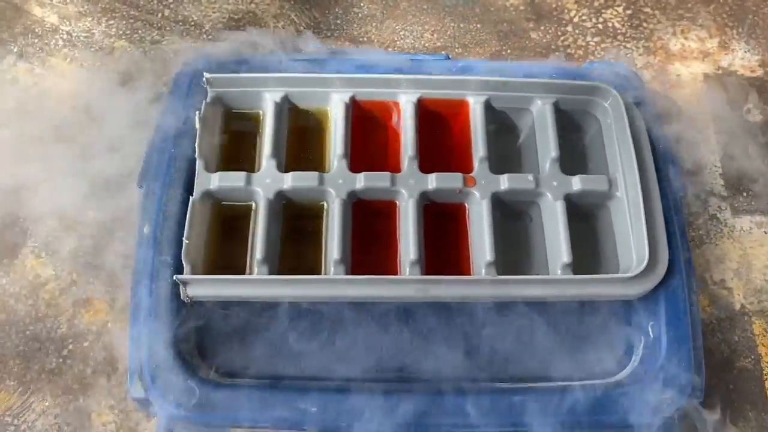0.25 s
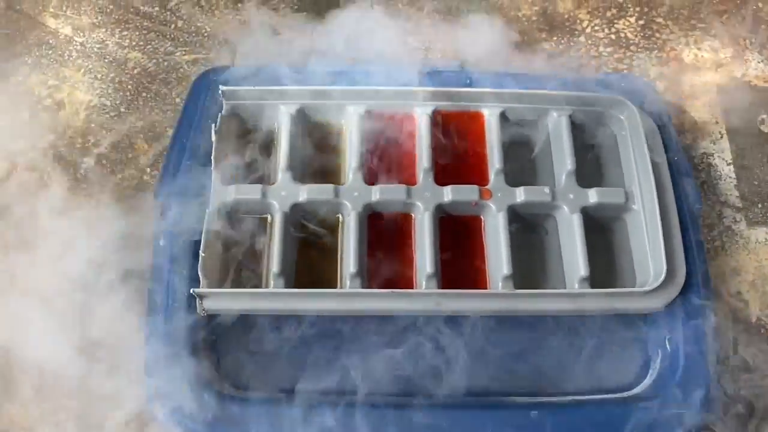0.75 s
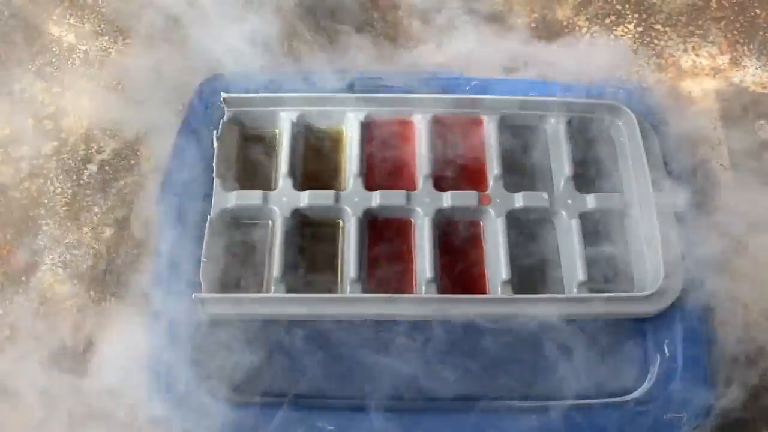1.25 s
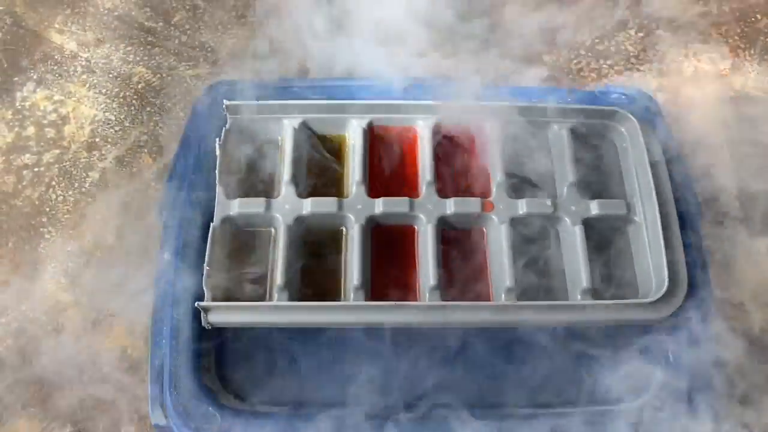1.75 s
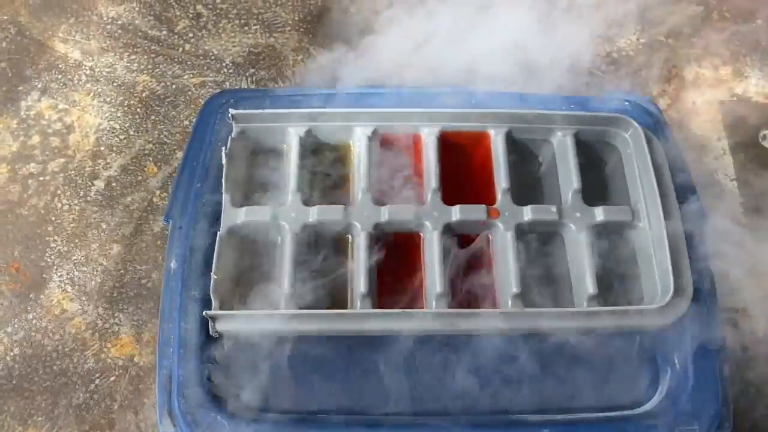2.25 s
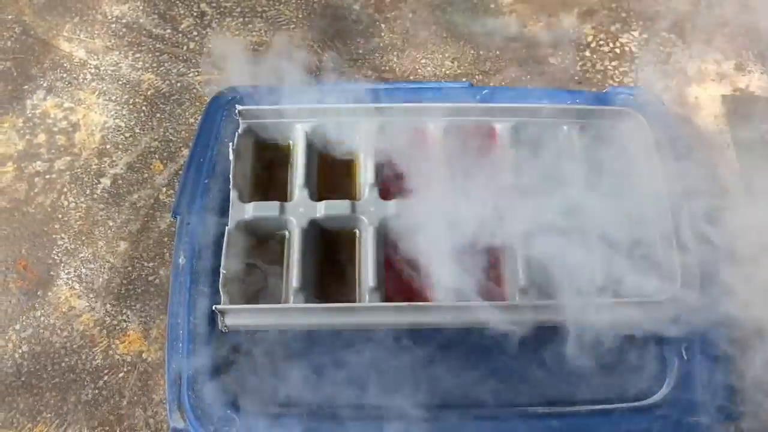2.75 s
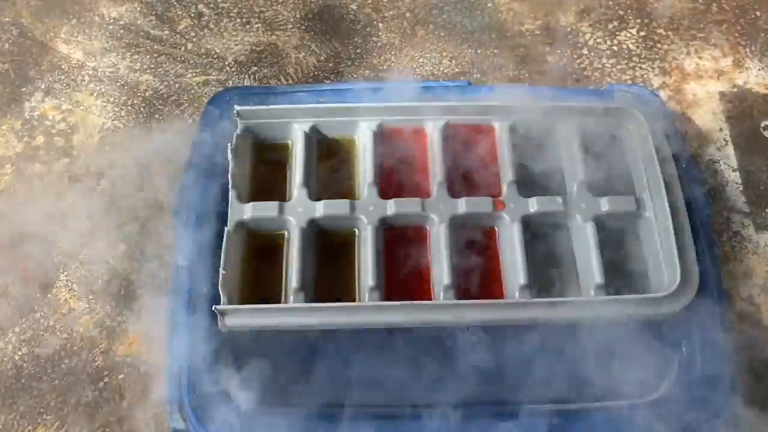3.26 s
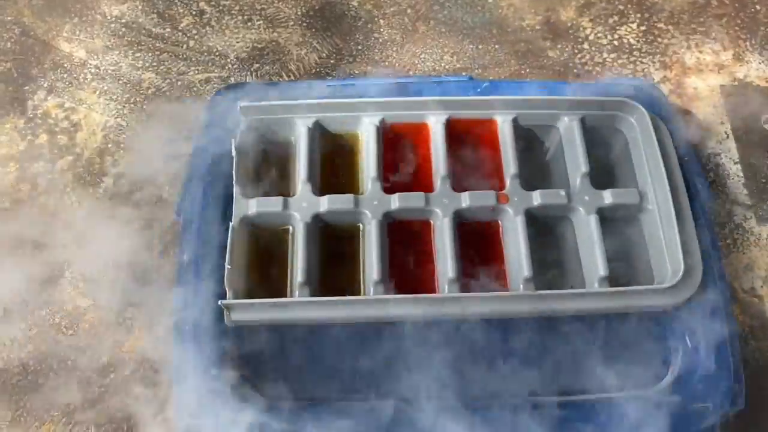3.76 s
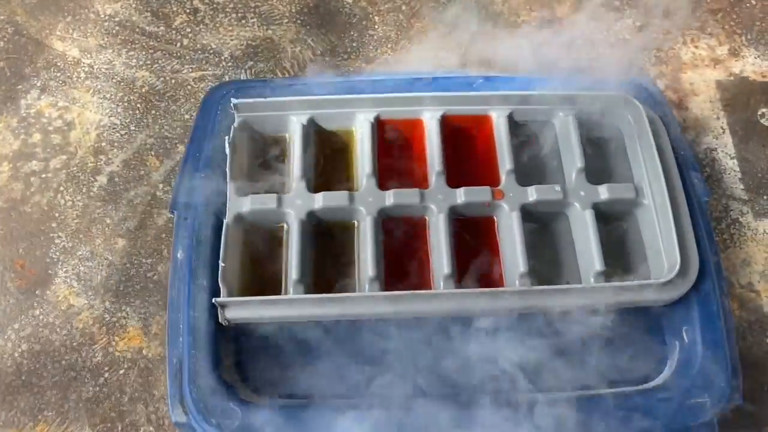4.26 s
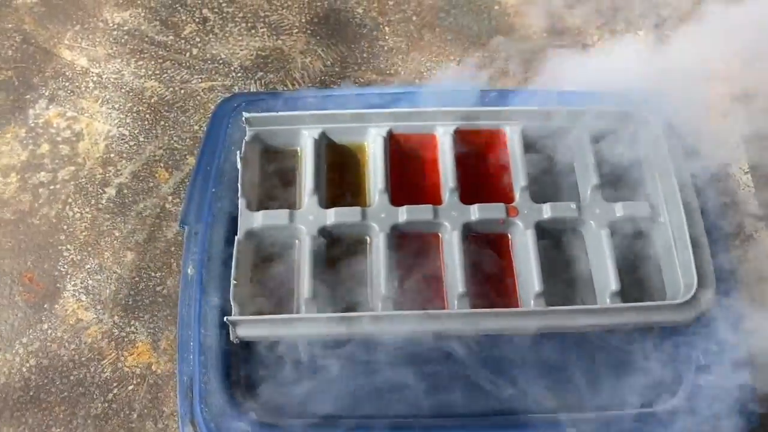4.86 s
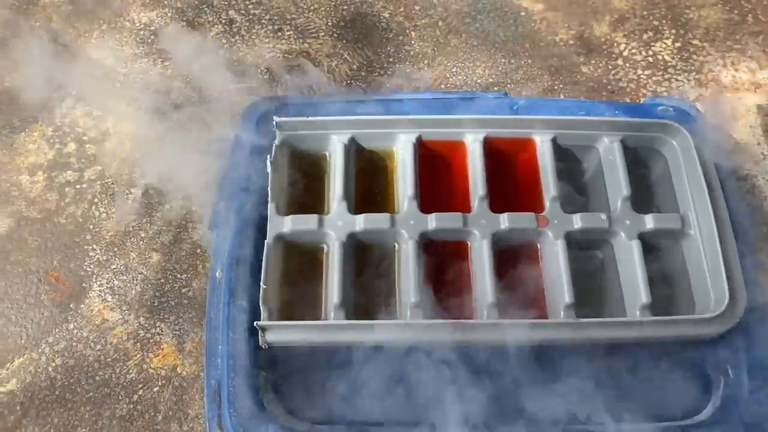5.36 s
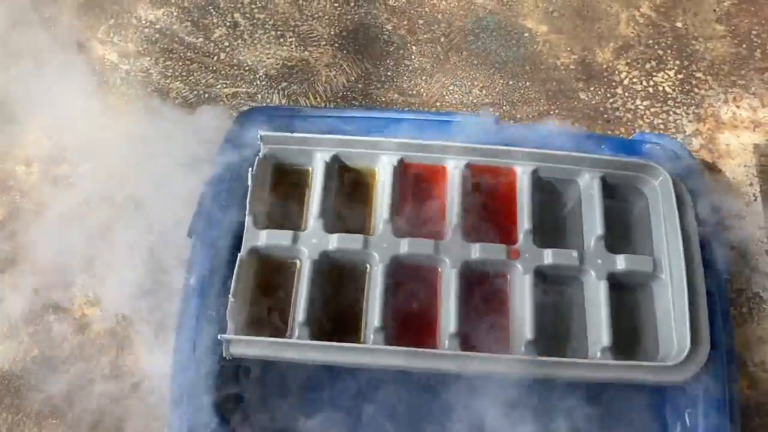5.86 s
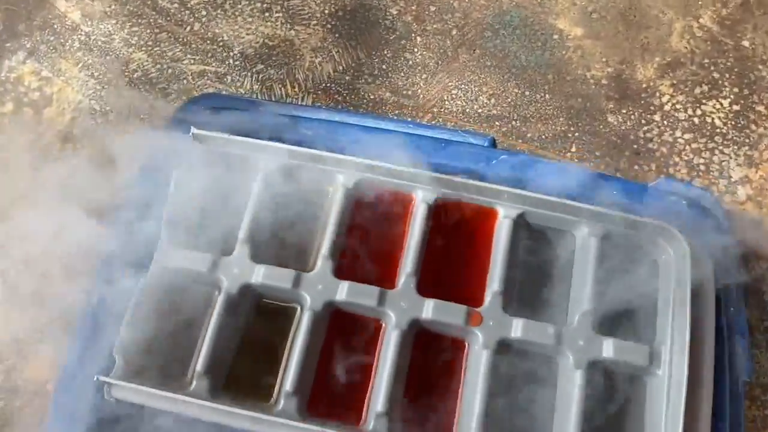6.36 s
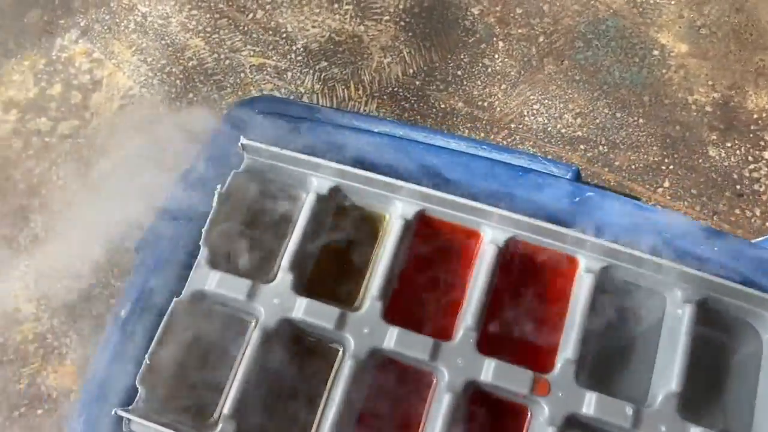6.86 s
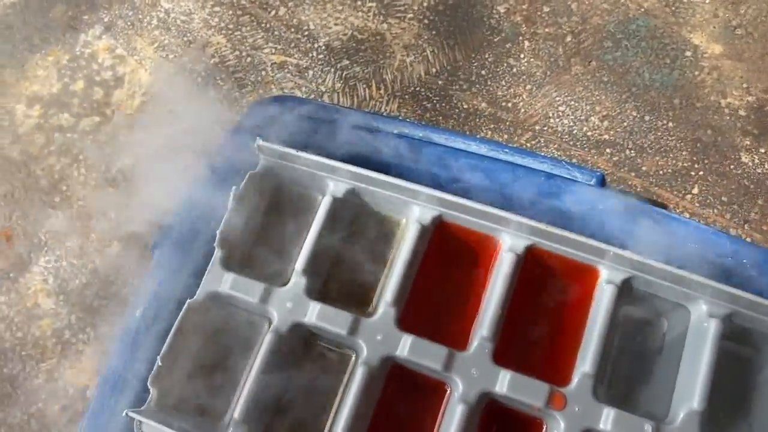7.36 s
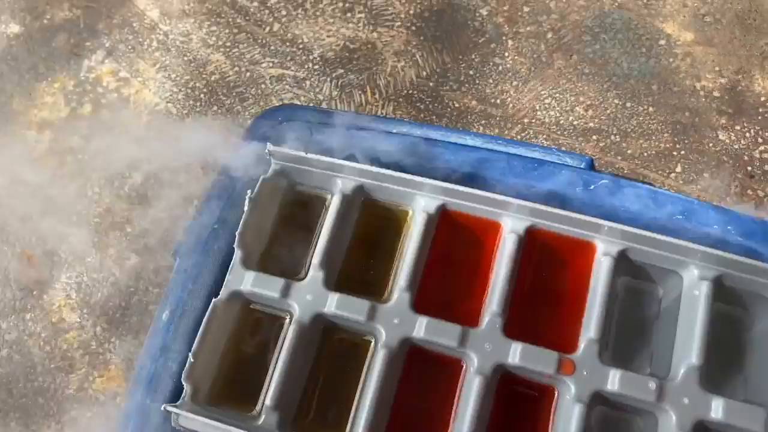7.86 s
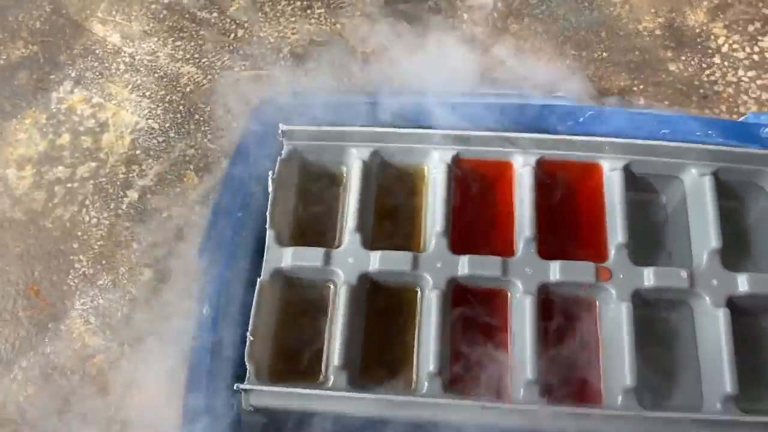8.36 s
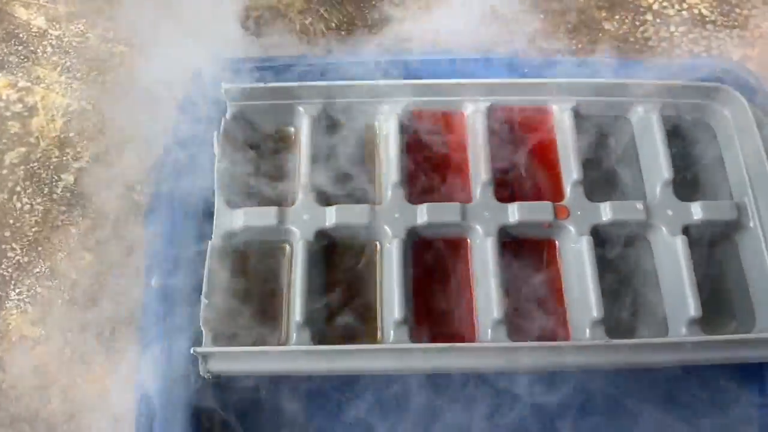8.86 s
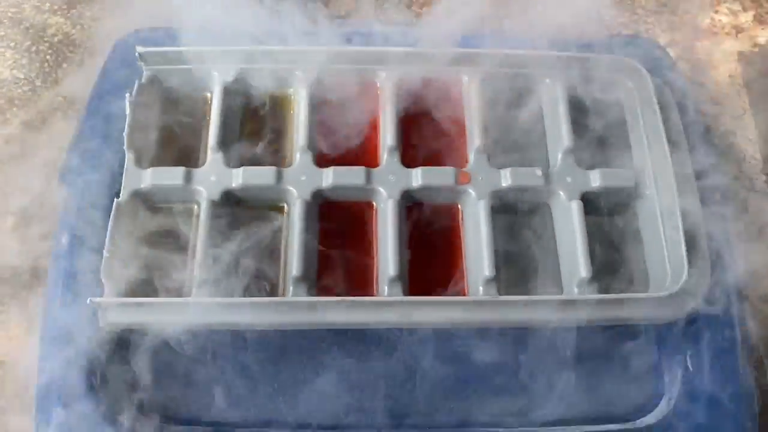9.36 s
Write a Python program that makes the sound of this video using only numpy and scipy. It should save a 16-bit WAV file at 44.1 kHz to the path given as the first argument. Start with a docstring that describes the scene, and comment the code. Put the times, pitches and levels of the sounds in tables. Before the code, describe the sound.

Sharp brittle cracks and tiny frost ticks over a soft, hollow boiling fizz under a plastic tray outdoors, with light air rumble and some handling noise.

```python
"""Sharp cracks and ticks over the fizz and pop of small bubbles, with puffs of air and rubs of a finger.
Liquid nitrogen simmers in a plastic lid under an ice-cube tray, outdoors on stone, close to a hand-held camera.
Cracks are blows that rattle damped modes of ice and plastic; the boil is coloured noise, clicks and short rings.
Air is low rumble with slowing swings of pressure; finger and hand are noise and slips coloured by case and skin."""
import sys
import numpy as np
from scipy import signal
from scipy.fft import rfft, irfft
from scipy.io import wavfile

SR = 44100
rng = np.random.default_rng(int(sys.argv[2]) if len(sys.argv) > 2 else 0)


def materialize(psi):
    """Save the field psi as 16-bit PCM at rate SR to the path in sys.argv[1].

    A 1-D psi becomes a single channel; in a 2-D psi each row is a channel.
    """
    bounded = np.clip(np.atleast_2d(psi).T, -1, 1)
    quanta = np.round(bounded * 32767).astype(np.int16)
    wavfile.write(sys.argv[1], SR, quanta)


N = 423351
FREQS = np.fft.rfftfreq(N, 1 / SR)
TIME = np.arange(N) / SR

# All source levels and colours are relative dB: gains in the functions come on top. Cracks of the freezing ice
# and plastic; the row at 6.41 s is instead the sharp part of the finger's bump on the camera. Each row: time in
# seconds, levels of tray, wall, ice and snap in dB, rings of cell, wall, wall again, ice and snap in Hz.
CRACK_EVENTS = [(0.0151, -44.5, -28.5, -27, -30.5, 1020, 1790, 3830, 7360, 10280),
                (0.1413, -59, -33.5, -38, -34.0, 1300, 2300, 2350, 5250, 8260),
                (0.2994, -49, -34.5, -39.5, -35, 1010, 3520, 2490, 5200, 8450),
                (0.4545, -63, -46, -37, -39.5, 1140, 1800, 3550, 7400, 7450),
                (0.534, -57, -49, -42, -46.5, 1400, 2080, 2410, 7300, 10130),
                (1.1176, -46, -39, -48, -43, 960, 2300, 1740, 5540, 7500),
                (1.419, -68, -53, -45.5, -45, 930, 3900, 2320, 5260, 8340),
                (1.4814, -61, -50.5, -42.5, -42.5, 950, 2720, 3920, 6440, 7150),
                (1.6325, -65, -47, -43, -49.5, 1300, 2460, 1770, 5960, 7300),
                (1.856, -48, -40, -58, -46, 1150, 1980, 1750, 7200, 9100),
                (2.2213, -36, -25, -23, -21.5, 1025, 3340, 2750, 5600, 7340),
                (2.733, -53, -43.5, -41.5, -38, 1370, 3100, 1860, 6060, 8150),
                (2.873, -61.0, -53, -41.5, -41, 1270, 2250, 2600, 5830, 7790),
                (3.0296, -68.0, -47.5, -46, -40, 1400, 3570, 2440, 4800, 7630),
                (3.0596, -36, -24.5, -25.0, -23.5, 1310, 1740, 2230, 6400, 9840),
                (3.2051, -48, -36, -37.5, -35.5, 1340, 2350, 3220, 6000, 9600),
                (3.389, -70, -48.5, -43.5, -40.5, 1290, 3470, 1900, 5370, 7900),
                (3.462, -58, -49.5, -49.5, -49, 1400, 2050, 2510, 5840, 7700),
                (3.6218, -54, -45.5, -50.5, -45.5, 1400, 1970, 2800, 5640, 7260),
                (3.8155, -55.0, -46, -37, -38.5, 1310, 1940, 3000, 7160, 7360),
                (4.301, -22, -19.5, -21.5, -24, 850, 2150, 2840, 7400, 10700),
                (4.66, -70, -49.5, -40.5, -42, 1200, 2560, 1580, 5700, 7440),
                (4.8395, -71, -51, -44, -45, 1400, 2960, 3780, 5660, 8540),
                (4.864, -47.5, -38.0, -44, -33.5, 1290, 1900, 2240, 7200, 7200),
                (4.9506, -53, -42, -36, -41, 1380, 2100, 1630, 5330, 7800),
                (4.9887, -56, -47.0, -45.5, -40.5, 1300, 2270, 1750, 5730, 7460),
                (5.7266, -46, -34.5, -27, -36, 1290, 1900, 2700, 5800, 11800),
                (6.4081, -41, -35.5, -38, -48.5, 1400, 2090, 1560, 4680, 8960),
                (6.855, -41.5, -36, -27, -33.5, 870, 2460, 3960, 5700, 7550),
                (7.2648, -47, -43, -47, -50, 850, 2200, 3900, 7200, 9210),
                (7.3066, -16.5, -20.5, -22.5, -26, 850, 2100, 3130, 5460, 9960),
                (7.4175, -59, -52, -46.5, -41, 870, 2290, 3370, 5680, 8160),
                (7.5691, -44.5, -39, -47, -42.5, 1170, 1800, 2240, 7100, 9910),
                (7.8329, -40.5, -30.5, -25.5, -28, 895, 1650, 1920, 4980, 7900),
                (8.269, -60, -45, -52.5, -47.5, 1110, 1800, 2250, 5800, 10090),
                (8.4914, -52, -61, -50, -48, 960, 1630, 2350, 5800, 10070),
                (9.1247, -57, -30, -19, -23.5, 1010, 3420, 1950, 7500, 8300)]
# Low modes of the whole tray, each a close pair that beats. Each row: centre in Hz, level in dB, t60 in seconds.
TRAY_MODES = [(880, 0.5, 0.029), (1250, 1.5, 0.031), (1590, -2.5, 0.012)]
# Ranges in which cell, wall, ice, snap and its topmost sparkle sound: edges in Hz.
CELL_HZ, WALL_HZ, ICE_HZ, SNAP_HZ = (850, 1400), (1600, 3520), (4980, 8240), (7500, 11000)
SPARKLE_HZ = (12700, 14700)
# Clear ticks of frost. Each row: start in seconds, level in dB.
FROST_TICKS = [(0.499, -33), (1.506, -29.5), (2.67, -32.5), (4.516, -34), (4.6227, -35), (4.7516, -36),
               (5.018, -35), (5.2474, -35), (5.2838, -34.5), (5.418, -36), (5.888, -36), (6.042, -35.5),
               (6.2276, -30.5), (6.3878, -35), (6.591, -29.5), (7.016, -31), (7.231, -30.5), (7.594, -31),
               (8.16, -36.5), (8.2317, -37), (8.391, -35), (8.6575, -33.5), (8.844, -32), (8.974, -31.5),
               (9.349, -28)]

# Vigour of the boil. Each row: time in seconds, level in dB.
BOIL_LEVEL = [(0.0, -55.5), (1.07, -56.5), (5.05, -56), (5.32, -57.5), (6.76, -54), (7.62, -55.5),
              (8.53, -55.5), (9.6, -55)]
# Colour of the wash of small bubbles. Each row: frequency in Hz, density in dB per Hz.
SIMMER_COLOUR = [(100, -3), (250, -1.5), (400, 2), (540, -3), (900, 1.5), (1120, -4.5), (1500, -4.5),
                 (2100, -6.5), (2550, -1.5), (3400, -10.5), (4400, -11.5), (5400, -55), (7000, -54),
                 (12000, -49)]
# Colour of the fine fizz. Each row: frequency in Hz, density in dB per Hz.
FIZZ_COLOUR = [(4000, -13), (5400, 5), (6500, -0.5), (7400, -7.5), (8400, 2), (10000, -1), (12500, -6),
               (16000, -20.5)]
# Colour of bursting bubbles. Each row: frequency in Hz, density in dB per Hz.
BUBBLE_COLOUR = [(250, -19), (800, 0.5), (1100, -17), (1800, 0), (2400, 0), (3000, -13.5), (3800, -16.5),
                 (5500, -28), (8000, -3), (14000, -34)]
# Air resonances between lid and tray. Each row: centre in Hz, width in Hz, lift in dB.
HOLLOW_MODES = [(337.6, 23.5, 13), (422, 31, 5.5), (814, 44, 2), (1310, 81, 8), (1750, 234, 6),
                (2135, 120, 5.5), (2410, 188, 6.5), (3103, 360, 6)]
# Large bubbles that burst on their own. Each row: start in seconds, level in dB.
BIG_BUBBLES = [(0.6018, -41), (1.2104, -41), (2.064, -35), (2.1507, -36), (2.164, -39), (2.1901, -36.5),
               (2.372, -40), (2.4906, -38), (2.947, -38), (2.962, -37), (3.471, -37), (5.84, -40),
               (8.163, -35), (8.232, -37), (8.241, -38), (8.2989, -39), (8.3264, -39), (8.3924, -40),
               (8.6107, -37), (8.8182, -36), (8.8434, -36), (8.8886, -39), (8.901, -41), (8.915, -37),
               (8.943, -38)]
# Sudden spits of boiling. Each row: start in seconds, level in dB, decay constant in seconds.
SPIT_EVENTS = [(5.591, -44.5, 0.028), (7.236, -41, 0.065), (8.481, -43.5, 0.057), (8.764, -33.5, 0.03),
               (9.16, -34, 0.013), (9.304, -43.5, 0.052)]
# Colour of a spit. Each row: frequency in Hz, density in dB per Hz.
SPIT_COLOUR = [(150, -9.5), (350, -4.5), (720, -7), (950, -12), (1500, -9.5), (2300, -5), (3000, -17.5),
               (3900, -21), (5600, -18), (8000, -20), (13000, -35)]

# Pushes of the finger along the case. Each row: start in seconds, length in seconds, level in dB.
FINGER_PUSHES = [(6.551, 0.043, -43), (6.608, 0.077, -42), (6.709, 0.14, -46.5), (6.815, 0.069, -41.5),
                 (6.885, 0.058, -44), (6.936, 0.066, -41), (7.032, 0.069, -40), (7.11, 0.02, -51.5)]
PUSH_RISE_S, PUSH_FADE_S = 0.016, 0.027
# Colour of the camera case. Each row: frequency in Hz, density in dB per Hz.
CASE_COLOUR = [(120, -27), (190, -10), (240, 0.5), (275, 7), (325, -12), (390, -0.5), (500, -13),
               (680, -10.5), (950, -31), (1400, -25), (3000, -64)]
# The bump rings the case. Each row: frequency in Hz, level in dB, t60 in seconds.
BUMP_S, BUMP_MODES = 6.411, [(278, -34, 0.16), (327, -29, 0.073), (413, -43, 0.029)]
# Colour of skin on the camera. Each row: frequency in Hz, density in dB per Hz.
SKIN_COLOUR = [(150, -37), (280, 3), (450, 7.5), (650, 0.5), (1000, 6.5), (1250, -6), (2100, -5),
               (3300, -8), (4700, -12), (6500, -37), (12000, -54)]
TURN_S, TURN_END_S, TURN_DB = 6, 8.55, -54.5
# Slopes before the turn, from its start, and further from its end.
TURN_RISE_DB_PER_S, TURN_EASE_DB_PER_S, TURN_FADE_DB_PER_S = 34, 2, 50

# The breeze at the microphone. Each row: time in seconds, level in dB.
AIR_LEVEL = [(0, -66), (0.35, -63), (0.5, -68), (0.95, -64), (1.12, -57), (1.75, -72), (2.3, -58.5),
             (3.5, -65.5), (3.9, -57), (4.8, -57), (5.4, -60.5), (5.8, -56.5), (6.3, -56), (6.9, -61),
             (7.45, -60.5), (7.8, -56), (8.3, -60.5), (9.6, -71)]
# Colour of the breeze. Each row: frequency in Hz, density in dB per Hz.
BREEZE_COLOUR = [(15, -40), (30, -8), (60, 5), (100, -3.5), (160, -8.5), (300, -13), (600, -59)]
# Single puffs. Each row: time in seconds (onset 5 ms before), level in dB, rate in Hz about one cycle in.
AIR_PUFFS = [(1.066, -46, 59), (1.198, -42.5, 88), (2.345, -38.5, 83.5), (2.54, -47, 74), (2.857, -47, 85),
             (2.896, -45, 100), (2.921, -40.5, 65), (2.977, -41, 76), (2.996, -47, 130), (3.251, -42.5, 75),
             (3.83, -43, 105), (3.874, -34.5, 122), (3.908, -43, 292), (3.92, -35, 162), (4.011, -39, 60),
             (4.102, -43, 282), (4.111, -36.5, 98), (4.168, -43.5, 230), (4.42, -46.5, 110),
             (4.93, -43.5, 80), (5.2, -41.5, 102), (5.931, -42, 71), (6.285, -43, 109), (6.362, -41, 80),
             (6.622, -39.5, 75), (6.672, -47, 80), (7.147, -45, 80.6), (7.291, -42.5, 86),
             (7.724, -34.5, 118), (7.872, -37.5, 116)]
# Rumble around a puff: level against the puff, and time constants of growth and decay.
WAKE_DB, WAKE_RISE_S, WAKE_FALL_S = -11.5, 0.032, 0.03

# Colour of the echo from the yard. Each row: frequency in Hz, density in dB per Hz.
ECHO_COLOUR = [(300, 0), (900, -2), (2000, -8), (3200, -1.5), (4300, -6), (5600, -1.5), (7000, -8),
               (10000, -19), (15000, -41)]
# Phase between the microphone ports. Each row: frequency in Hz, lead of the left in radians.
PORT_PHASE_RAD = [(0, 0), (700, -.8), (1250, -.3), (1700, 0), (2500, .7), (4000, .6), (4900, .1),
                  (7300, 3.1), (16000, 11.9)]
# Balance of the ports, scaled by each source's shade. Each row: frequency in Hz, left minus right in dB.
PORT_BALANCE_DB = [(150, -2), (400, -5), (800, -9), (1250, -20), (1700, -2.5), (2300, -2.5), (5000, 0)]
# Likeness of the ports in diffuse sound. Each row: frequency in Hz, correlation (no unit).
PORT_CORRELATION = [(60, 0.96), (300, 0.82), (640, 0.078), (1400, 0.79), (3000, 0.38), (6000, 1),
                    (15000, 1)]
EDGE_HZ = 16700


def cracks(wall_decay_s=0.019, ice_decay_s=0.018, snap_decay_s=0.012, cell_decay_s=0.026,
           weak_lift=3.65, big_lift=1.3, second_lift=0.61, ring_width=0.046,
           rise_s=0.00021, first_blow=0.62, sparkle_db=-14, pair_split_hz=125):
    """A fracture is a sharp blow and a short rattle through ice and wall; a big one rings the whole tray."""
    t = np.arange(2048) / SR
    hz = np.fft.rfftfreq(len(t), 1 / SR)
    out = np.zeros(N)

    def sized(x):
        """Scales to the energy of 10 ms at rms 1."""
        return x / np.sqrt(np.sum(x ** 2) / 441)

    def mode(ring_hz):
        """Response of one damped resonance."""
        return 1 / (1 + 1j * (hz - ring_hz) / (ring_width * ring_hz))

    def rattle(edges_hz, decay_s, rings, order):
        """Crowded, heavily damped modes fill a range almost evenly; the rings stand out."""
        chatter = rng.choice([-1., 1.], len(t)) * (1 - np.exp(-t / rise_s)) * gain_of(-60 * t / decay_s)
        burst = first_blow + rfft(chatter / np.linalg.norm(chatter))
        even = burst / (abs(burst) + 1e-9) ** .6  # flattens the spectrum
        sound = irfft(even * (1 + rings)) * np.exp(-t / decay_s)
        return sized(band(sound, edges_hz, order))

    # The beat of each pair cuts the knock short; signs alternate from mode to mode.
    knock = sum((-1) ** k * ring([pair], t) for k, pair in enumerate(TRAY_MODES))
    whole = sized(np.sin(np.pi * pair_split_hz * t) * knock)
    for s, tray_db, wall_db, ice_db, snap_db, cell_hz, wall_hz, second_hz, ice_hz, snap_hz in CRACK_EVENTS:
        share = np.interp(tray_db, [-34, -26], [0, 1])  # weak cracks shake only the nearest cell
        lift = weak_lift + share * (big_lift - weak_lift)  # big ones spread, so rings stand out less
        cell = rattle(CELL_HZ, cell_decay_s, lift * mode(cell_hz), order=3)
        tray = sized(share * whole + (1 - share) * cell)
        wall_rings = lift * (mode(wall_hz) + second_lift * mode(second_hz))
        wall = rattle(WALL_HZ, wall_decay_s, wall_rings, order=3)
        ice = rattle(ICE_HZ, ice_decay_s, lift * mode(ice_hz), order=3)
        sparkle = rattle(SPARKLE_HZ, snap_decay_s, 0, order=2)
        snap = rattle(SNAP_HZ, snap_decay_s, lift * mode(snap_hz), order=2) + gain_of(sparkle_db) * sparkle
        crack = gain_of(tray_db) * tray + gain_of(wall_db) * wall + gain_of(ice_db) * ice + gain_of(snap_db) * snap
        add(out, s - .0002, crack)
    return ports(out, shade=0.85)


def frost(per_s=12, size_db=-49, spread_db=3.5, t60_s=0.011, clear_db=-3):
    """Tiny bright noise ticks of frost: a few clear, many faint and more frequent as the tray gets colder."""
    t = np.arange(600) / SR
    out = np.zeros(N)

    def tick(db):
        """A very short splinter of noise."""
        return rng.standard_normal(len(t)) * gain_of(db - 60 * t / t60_s)

    for s, db in FROST_TICKS:
        add(out, s, tick(db + clear_db))
    candidates = 800
    for at, chance, size in rng.random((candidates, 3)):
        faint = tick(size_db + spread_db * min(-np.log(size), 2.5))
        if chance < per_s * (.5 + at) * N / SR / candidates:
            add(out, at * N / SR, faint)
    return ports(band(out, (3200, 12000), order=2))


def simmer(wash_db=-2.5, fizz_db=-5, wash_flicker_db=2., fizz_flicker_db=1.36):
    """Countless small bubbles merge to a flickering noise wash with a fine fizz on top."""
    flicker = wander(39)
    wash = coloured(diffuse() * gain_of(wash_flicker_db * flicker), SIMMER_COLOUR)
    fizz = coloured(diffuse() * gain_of(fizz_flicker_db * flicker), FIZZ_COLOUR)
    return gain_of(wash_db) * wash + gain_of(fizz_db) * fizz


def bubbles(pops_per_s=220, pops_db=-6, pop_decay_s=0.0011, blips_per_s=170, blips_db=-10, cycles=5,
            spread_db=4.0, clump_db=5, clumps_per_s=12, growth_db=3):
    """Bubbles come in flurries, more as the boil goes on; they burst with a dry pop or ring for a few cycles."""
    clump = clump_db * np.minimum(wander(clumps_per_s), 1.5)
    flurry = gain_of(clump + growth_db * (TIME / TIME[-1] - .5))  # scales both rates

    def train(per_s):
        """Random clicks of uneven size."""
        size = np.minimum(rng.exponential(1, N), 2.6)
        return (rng.random(N) < flurry * per_s / SR) * gain_of(spread_db * size)

    t = np.arange(700) / SR
    pitches_hz = np.geomspace(1720, 2900, 12)
    pop_train, blip_train = train(pops_per_s), train(blips_per_s)
    spot = rng.integers(0, len(pitches_hz), N)
    pops, blips = np.zeros((2, N))
    for k, hz in enumerate(pitches_hz):
        pop = rng.standard_normal(len(t)) * np.exp(-t / pop_decay_s)
        age = t * hz / cycles
        blip = age * np.exp(-3 * age) * np.sin(2 * np.pi * hz * t)
        pops += signal.oaconvolve(pop_train * (spot == k), pop)[:N]
        blips += signal.oaconvolve(blip_train * (spot == k), blip)[:N]
    return gain_of(pops_db) * coloured(pops, BUBBLE_COLOUR) + gain_of(blips_db) * evened(blips)


def in_lid(x, boil_db=0.42):
    """The boil sounds through the resonant hollow under the tray, as strongly as it bubbles."""
    lift_db = sum(db / (1 + (2 * (FREQS - hz) / width_hz) ** 2) for hz, width_hz, db in HOLLOW_MODES)
    resonant = irfft(rfft(x) * gain_of(lift_db + boil_db), N)
    return ports(resonant * level(BOIL_LEVEL), shade=0.53)


def big_bubbles(pop_db=3, ring_hz=2280, spread=0.081, ring_decay_s=0.0018, rise_s=0.00049,
                splash_db=-5, splash_decay_s=0.00061, splash_hz=(1400, 4600)):
    """A large bubble bursts: its cavity rings for a few cycles inside a tiny noise splash."""
    t = np.arange(700) / SR
    out = np.zeros(N)
    for s, db in BIG_BUBBLES:
        hz = ring_hz * (1 + spread * rng.uniform(-1, 1))
        cavity = np.sin(2 * np.pi * hz * t) * np.exp(-t / ring_decay_s)
        noise = evened(band(rng.standard_normal(len(t)), splash_hz, order=2))
        splash = gain_of(splash_db) * noise * np.exp(-t / splash_decay_s)
        add(out, s, gain_of(db + pop_db) * (1 - np.exp(-t / rise_s)) * (cavity + splash))
    return ports(out)


def spits(rise_s=0.0059, grit_db=3.4):
    """The liquid meets a warmer spot and flashes off in a soft splutter of gritty noise."""
    swell = np.zeros(N)
    for s, db, decay_s in SPIT_EVENTS:
        age_s = np.maximum(TIME - s, 0)
        swell += gain_of(db) * (1 - np.exp(-age_s / rise_s)) * np.exp(-age_s / decay_s)
    grit = gain_of(grit_db * np.minimum(wander(300), 1.4))
    return ports(swell * coloured(diffuse() * grit, SPIT_COLOUR), shade=0.62)


def finger(grip_db=1, lean_db=2.5, slips_per_s=700, slip_spread_db=2, slips_db=-3, rasp_db=-11,
           rasp_hz=(500, 1000)):
    """A finger bumps the camera, then drags: skin sticks and slips, which booms in the case; ridges rasp."""
    pressure = sum(push(*row) for row in FINGER_PUSHES)
    size = gain_of(slip_spread_db * np.minimum(rng.exponential(1, N), 3))
    slips = evened((rng.random(N) < slips_per_s / SR) * rng.choice([-1., 1.], N) * size)
    friction = (diffuse() + gain_of(slips_db) * slips) * gain_of(grip_db * wander(66))
    rasp = gain_of(rasp_db) * evened(band(slips, rasp_hz, order=2))
    slide = coloured(friction, CASE_COLOUR) + rasp
    bump = np.zeros(N)
    add(bump, BUMP_S, ring(BUMP_MODES, np.arange(SR // 5) / SR))
    return (slide * pressure + bump) * gain_of([[-lean_db], [lean_db]])  # stronger at the right


def push(s, length_s, db):
    """Pressure of one push: it builds, holds and lets go."""
    age_s = np.maximum(TIME - s, 0)
    release = np.exp(-np.clip((age_s - length_s) / PUSH_FADE_S, 0, 20))
    return gain_of(db) * (1 - np.exp(-age_s / PUSH_RISE_S)) * release


def hand(grain_db=5.5):
    """Skin rubs softly on the turning camera: grainy noise swells fast, eases slowly, then dies away."""
    before_s, since_s, after_s = np.maximum([TURN_S - TIME, TIME - TURN_S, TIME - TURN_END_S], 0)
    fall_db = TURN_RISE_DB_PER_S * before_s + TURN_EASE_DB_PER_S * since_s + TURN_FADE_DB_PER_S * after_s
    grain = gain_of(grain_db * wander(52))
    return gain_of(TURN_DB - fall_db) * coloured(diffuse() * grain, SKIN_COLOUR)


def air(rumble_db=1.5, lumpy_db=3.5, gusty_db=4.0, gusts_per_s=6):
    """A lumpy low rumble; each passing eddy is a short, slowing swing of pressure wrapped in more rumble."""
    puffs = np.zeros((2, N))
    t = np.arange(SR // 8) / SR
    gusts = gain_of(gusty_db * np.minimum(wander(gusts_per_s), 1.3))
    power = (level(AIR_LEVEL) * gusts) ** 2
    for s, db, hz in AIR_PUFFS:
        age = t * hz
        phase = 2 * np.pi * 2.285 * np.log1p(age / 1.11)  # the logarithm slows the swing
        swing = np.sin(phase + rng.normal(0, 0.22, (2, 1)))
        eddies = gain_of(db) * 4 * age * np.exp(-1.5 * age) * swing
        for port, eddy in zip(puffs, eddies):
            add(port, s - .005, eddy)
        away = np.maximum((s - TIME) / WAKE_RISE_S, (TIME - s) / WAKE_FALL_S)
        power += (gain_of(db + WAKE_DB) * np.exp(-np.minimum(away, 20))) ** 2
    rumble = coloured(diffuse() * gain_of(lumpy_db * wander(17.0)), BREEZE_COLOUR)
    return gain_of(rumble_db) * np.sqrt(power) * rumble + puffs


def hiss(peak_s=6.27, width_s=0.17, hiss_db=-63.5, edges_hz=(4300, 5150)):
    """A soft, narrow band of noise swells and sinks again."""
    swell = np.exp(-((TIME - peak_s) / width_s) ** 2 / 2)
    return gain_of(hiss_db) * swell * evened(band(diffuse(), edges_hz, order=3))


def yard(x, t60_s=0.3):
    """Rough ground and walls scatter sharp sounds into a faint hush: noise follows their smeared power."""
    t = np.arange(SR // 2) / SR
    decay = gain_of(-60 * t / t60_s) ** 2 * (1 - np.exp(-t / 0.0015))
    power = signal.oaconvolve((x ** 2).mean(0), decay / decay.sum())[:N]
    return ports(np.sqrt(abs(power)) * coloured(diffuse(), ECHO_COLOUR), shade=0.29)


def ports(x, shade=1.):
    """Sound from the tray reaches the two ports with unequal delay and shading."""
    turn = np.exp(.5j * np.interp(FREQS, *np.transpose(PORT_PHASE_RAD)))
    lean = gain_of(shade * read(PORT_BALANCE_DB, FREQS) / 2)
    mean_gain = np.sqrt((lean ** 2 + lean ** -2) / 2)
    return irfft(rfft(x) * np.array([turn * lean, 1 / (turn * lean)]) / mean_gain, N)


def diffuse():
    """White noise that the two ports hear partly alike."""
    a, b = rfft(rng.standard_normal((2, N)))
    same = np.clip(read(PORT_CORRELATION, FREQS), -1, 1)
    return irfft(np.array([a, same * a + np.sqrt(1 - same ** 2) * b]), N)


def ring(modes, t):
    """Sum of dying sines."""
    return sum(gain_of(db - 60 * t / t60_s) * np.sin(2 * np.pi * hz * t) for hz, db, t60_s in modes)


def wander(per_s):
    """Smooth random motion of rms 1."""
    return evened(irfft(rfft(rng.standard_normal(N)) * np.exp(-(FREQS / per_s) ** 2), N))


def coloured(x, spectrum):
    """Filters a full-length sound by a spectrum, to rms 1."""
    return evened(irfft(rfft(x) * gain_of(read(spectrum, FREQS)), N))


def band(x, edges_hz, order):
    """Keeps a range of frequencies."""
    edges_hz = np.clip(edges_hz, 50, SR / 2 - 50)
    return signal.sosfilt(signal.butter(order, edges_hz, "band", fs=SR, output="sos"), x)


def read(points, hz):
    """Reads a curve on a log-frequency axis."""
    f, value = np.transpose(points)
    return np.interp(np.log(hz + 1), np.log(f + 1), value)


def level(curve):
    """Gain over time from rows of seconds and dB."""
    return gain_of(np.interp(TIME, *np.transpose(curve)))


def gain_of(db):
    """Decibels to an amplitude factor."""
    return 10 ** (np.asarray(db) / 20)


def evened(x):
    """Scales to rms 1."""
    return x / np.sqrt(np.mean(x ** 2) + 1e-20)


def add(mix, s, sound):
    """Mixes a sound in at time s in seconds."""
    part = mix[max(round(s * SR), 0):][:len(sound)]
    part += sound[:len(part)]


def scene(echo_db=-24):
    """Everything at the two ports."""
    sharp = cracks() + frost()
    boil = in_lid(simmer() + bubbles()) + big_bubbles() + spits()
    handling = finger() + hand()
    return sharp + boil + handling + air() + hiss() + gain_of(echo_db) * yard(sharp)


def record(dry):
    """Rounds off the loudest peaks below 0.85 of full scale, then low-passes."""
    rounded = dry / (1 + (dry / .85) ** 4) ** .25
    lowpass = signal.firwin(511, EDGE_HZ, window=("kaiser", 9), fs=SR)
    return signal.oaconvolve(rounded, lowpass[None], "same")


dry = scene()
out = record(dry)
materialize(out)
```